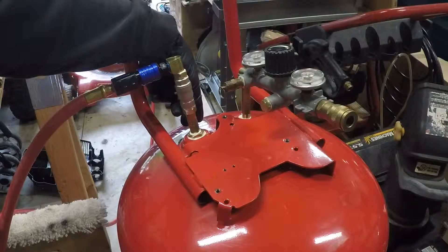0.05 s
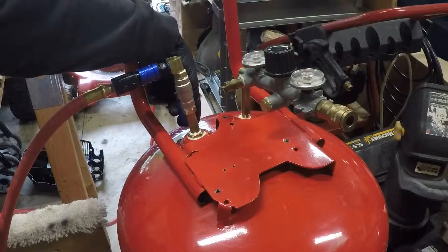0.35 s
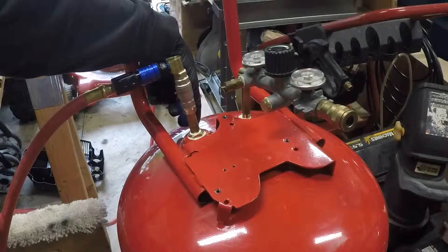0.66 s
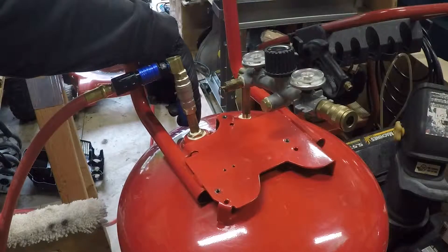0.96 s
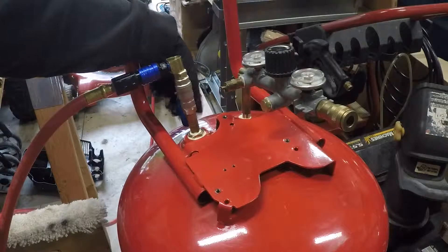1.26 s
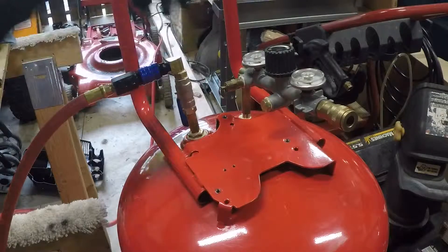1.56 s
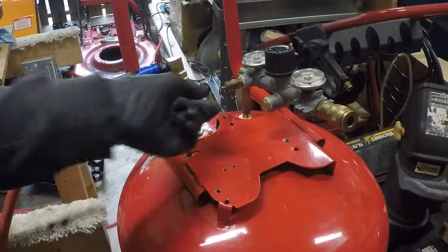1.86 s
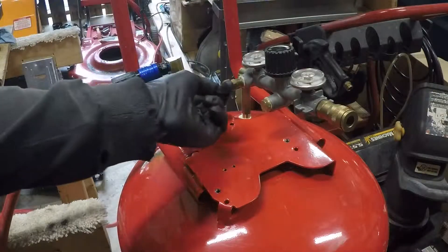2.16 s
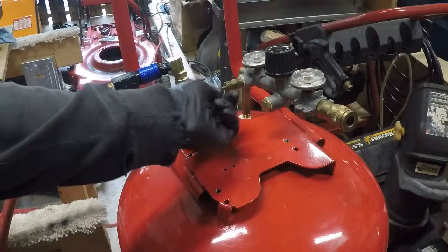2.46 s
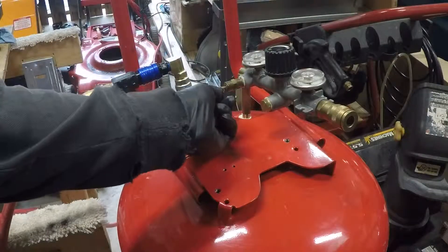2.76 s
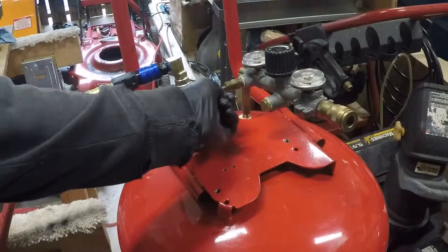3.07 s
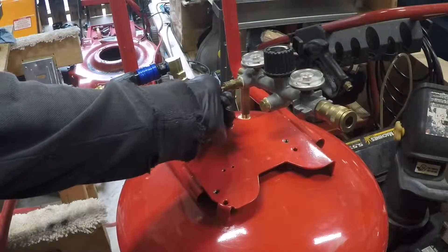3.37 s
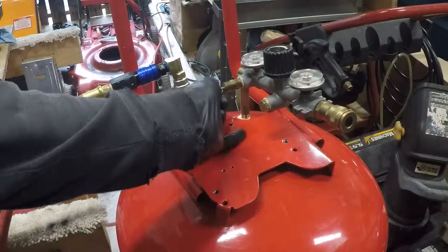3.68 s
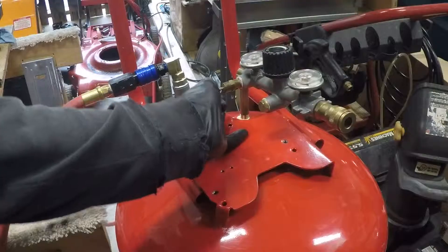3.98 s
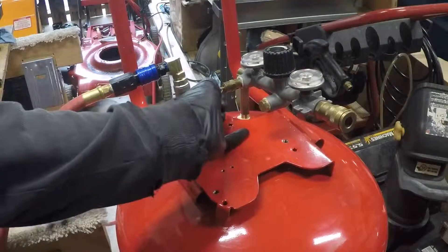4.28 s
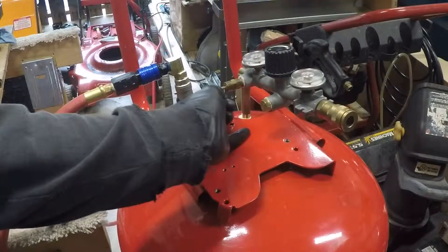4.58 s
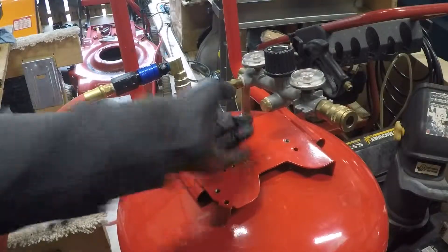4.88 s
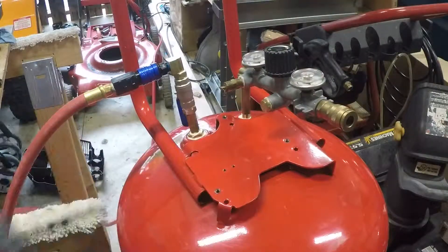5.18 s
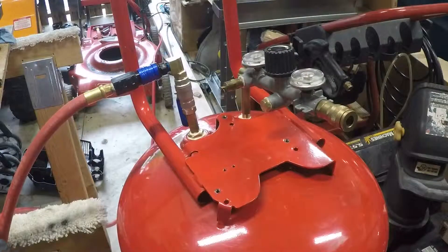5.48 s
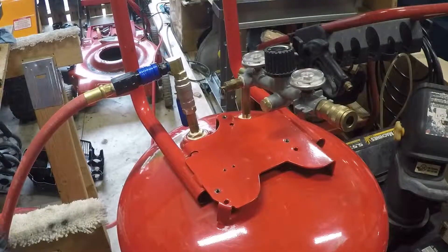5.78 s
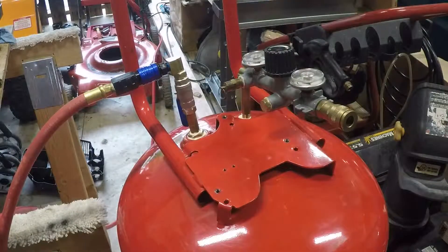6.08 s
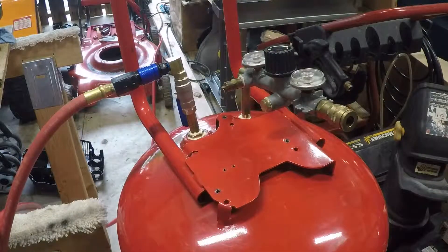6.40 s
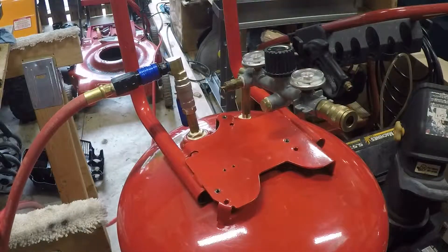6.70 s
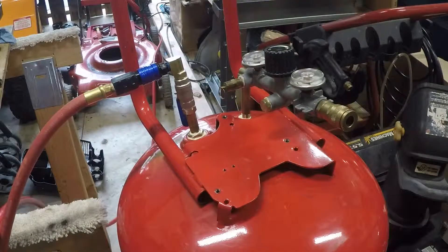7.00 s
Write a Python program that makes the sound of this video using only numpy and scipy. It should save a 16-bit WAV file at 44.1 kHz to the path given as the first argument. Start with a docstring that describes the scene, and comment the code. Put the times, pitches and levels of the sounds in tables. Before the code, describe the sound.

Compressed air hisses steadily into a hollow, ringing steel tank, with two short, loud spits of air, each cut off by a small click.

```python
"""A jet of compressed air pours through a coupling into an empty steel tank in a workshop.
The jet makes the hollow tank ring, and its hiss loses edge as the pressure builds. A gloved hand
works a valve on the tank: air spits out twice, each time cut off by a small click, and a nearby
camera's gain control turns the loud spits down. The workshop rumbles softly underneath."""
import sys
import numpy as np
from scipy import signal
from scipy.fft import rfft, irfft, next_fast_len
from scipy.io import wavfile
from scipy.ndimage import map_coordinates

SR = 44100
rng = np.random.default_rng(int(sys.argv[2]) if len(sys.argv) > 2 else 0)


def to_wav(s):
    """Save 16-bit WAV."""
    ch = np.atleast_2d(s).T  # columns
    pcm = np.round(np.clip(ch, -1, 1) * 32767)  # PCM
    wavfile.write(sys.argv[1], SR, pcm.astype(np.int16))


N = 319706
t = np.arange(N) / SR
FFT_SIZE = next_fast_len(N + SR // 2)
HZ = np.fft.rfftfreq(FFT_SIZE, 1 / SR)

# The workshop's rumble: (frequency [Hz], level [dB])
ROOM_SPECTRUM = [(15, -60), (35, -63.5), (65, -62), (90, -67.5), (120, -79), (200, -83.5), (500, -101)]
# The valve snaps shut: (time [s], knock level [dB], tick level [dB])
VALVE_CLICKS = [(4.089, -19, -22), (4.512, -17, -22)]
# The valve lets air out: (opening time [s], shutting time [s], leak level [dB], gush level [dB])
VALVE_SPITS = [(3.902, 4.082, -0.5, -4), (4.313, 4.516, -1.5, 0)]
# The thin leak past the valve's seal and its full gush: (frequency [Hz], level [dB])
LEAK_SPECTRUM = [(1500, -70.5), (3000, -85), (4400, -46.5), (5500, -48.5), (7000, -54.5), (8800, -59),
                 (11000, -57), (15000, -55.5)]
GUSH_SPECTRUM = [(40, -58), (150, -56), (450, -61.5), (950, -54.5), (1600, -57), (3000, -66), (5500, -54.5),
                 (7500, -52), (9000, -53.5), (11000, -51), (13000, -52), (15000, -45.5)]
# How the tank's tones and the low whistle grow and fade:
# (peak time [s], peak level [dB], rise [dB/s], fall [dB/s])
BEATING_PAIR_PEAKS = [(.25, -24.5, 4.7, 3), (1.8, -22, 13, 3.2), (5.95, -25, 4.1, 7)]
UPPER_RING_PEAKS = [(.4, -20.5, 4, 8.5), (1.85, -22.5, 4, 7.1), (4.6, -26, 1.7, 2)]
LOW_TONE_PEAKS = [(.4, -55.5, 4, 4), (3.3, -47.5, 4.8, 5.7)]
LOW_WHISTLE_PEAKS = [(5.4, -21, 4, 1.7)]
# Modes, the pitches the tank rings at: (frequency [Hz], width [Hz], level above the hiss [dB])
TANK_MODES = [(753, 14, 7), (909, 6, 22), (1079, 6, 19), (1187, 7, 21), (1286, 6, 15), (1313, 6, 11),
              (1488, 8, 19), (1536, 10, 10), (1706, 8, 14), (1838, 9, 12), (1913, 7, 19), (1951, 9, 10),
              (2010, 7, 16), (2077, 11, 14), (2209, 11, 12), (2500, 10, 7), (2548, 7, 11), (2651, 14, 11),
              (3400, 14, 6), (3676, 7, 9), (3878, 10, 7), (3983, 16, 6), (4287, 9, 7), (4457, 9, 7),
              (4686, 8, 9), (5251, 11, 5), (6201, 20, 6)]
# The jet heard through the tank wall: (frequency [Hz], level when empty [dB], level when filled [dB])
JET_SPECTRUM = [(170, -82.5, -79.5), (374, -82.5, -82.5), (926, -78.5, -75), (1733, -71, -71.5),
                (2256, -57, -58), (2790, -53.5, -55.5), (3950, -52, -51.5), (4240, -50, -48),
                (4600, -51.5, -54), (4900, -54, -55), (6740, -56.5, -58.5), (9020, -66.5, -68.5),
                (9750, -65.5, -63), (12950, -69.5, -68.5), (15000, -68.5, -74)]


def amp(db):
    """Turn decibels into a gain, a number to multiply a sound by."""
    return 10 ** (np.asarray(db) / 20)


def unit(x):
    """Scale a signal so that its average power is 1."""
    return x / np.sqrt(np.mean(np.abs(x) ** 2))


def colours(spectrum):
    """Turn each level column of a spectrum table into a gain for every frequency."""
    hz, *columns = np.transpose(spectrum)
    return [amp(np.interp(np.log(HZ + 1), np.log(hz), db)) * np.sqrt(SR / 2) for db in columns]


def filtered(x, gain):
    """Turn each frequency of a sound up or down by its gain."""
    return irfft(rfft(x, FFT_SIZE) * gain, FFT_SIZE)[:N]


def noise(gain):
    """White noise shaped by a gain for every frequency."""
    return filtered(rng.standard_normal(FFT_SIZE), gain)


def wobble(rate):
    """A smooth curve through `rate` random points a second."""
    return map_coordinates(rng.standard_normal(int(N * rate / SR) + 4), [t * rate])


def resonance(hz, width):
    """A peak in the spectrum, 1 at its centre and half that at the edges of its width."""
    return 1 / (1 + (2 * (HZ - hz) / width) ** 2)


def swells(peaks):
    """A gain that climbs to each peak and sinks again; the strongest swell wins."""
    curves_db = [db - np.maximum(rise * (time - t), fall * (t - time)) for time, db, rise, fall in peaks]
    return amp(np.max(curves_db, axis=0))


def tone(hz, width):
    """A wavering tone made from a narrow band of noise, its loudness partly evened out."""
    ring = signal.hilbert(noise(resonance(hz, width) * resonance(hz, 4 * width)))
    loudness = np.abs(unit(ring))
    return unit(ring.real / np.sqrt(loudness + 0.2))


def room_rumble():
    """The workshop's steady, low background noise."""
    return noise(*colours(ROOM_SPECTRUM))


def reflections(x, echo_db=-11, ring_s=0.09, treble_hz=5000):
    """Sound bounces off the tank wall and the clutter around it, rippling the treble."""
    echoes = unit(rfft(rng.standard_normal(N) * amp(-60 * t / ring_s), FFT_SIZE))
    treble = HZ ** 2 / (HZ ** 2 + treble_hz ** 2)
    return filtered(x, 1 + amp(echo_db) * treble * echoes)


def valve_clicks(knock_hz=250, knock_s=0.019, tick_s=0.0067):
    """The shutting valve gives a dull knock with a short tick."""
    sound = np.zeros(N)
    for time, knock_db, tick_db in VALVE_CLICKS:
        age = np.maximum(t - time, 0)
        knock = amp(knock_db - 60 * age / knock_s) * np.sin(2 * np.pi * knock_hz * age)
        tick = amp(tick_db - 60 * age / tick_s) * rng.standard_normal(N)
        sound += (t > time) * (tick - knock)
    return sound


def valve_spits(open_s=0.047, close_s=0.03, tail_s=0.2, sputter_db=0.5):
    """Air leaks as soon as the valve cracks open, then gushes as the gap widens."""
    leak, gush = np.zeros(N), np.zeros(N)
    for opens, shuts, leak_db, gush_db in VALVE_SPITS:
        cracked = np.clip((t - opens) / 0.003, 0, 1)
        gap = np.clip(np.minimum((t - opens) / open_s, (shuts - t) / close_s), 0, 1)
        tail = np.where(t < shuts, 1, amp(-2.5 - 60 * np.abs(t - shuts) / tail_s))  # the room rings on
        leak += amp(leak_db) * cracked * tail
        gush += amp(gush_db) * gap
    air = leak * noise(*colours(LEAK_SPECTRUM)) + gush * noise(*colours(GUSH_SPECTRUM))
    return air * amp(sputter_db * wobble(90))


def tank_singing(waver_db=0.9, hum_db=-55):
    """The flow keeps a few modes sounding: two close ones that beat, a higher ring and two low tones."""
    pair = swells(BEATING_PAIR_PEAKS) * unit(tone(hz=2344, width=12) + tone(hz=2371, width=18))
    upper = swells(UPPER_RING_PEAKS) * tone(hz=2765, width=16)
    low = swells(LOW_TONE_PEAKS) * tone(hz=537, width=10)
    hum = amp(hum_db) * tone(hz=236, width=6)
    return pair + upper * amp(waver_db * wobble(5.98)) + low + hum


def tank_response(ring_s=0.16, crowd_share=0.68, blur_hz=11000):
    """The tank's strong modes stand over a crowd of weak ones, which blur together in the treble."""
    crowd = np.abs(unit(rfft(rng.standard_normal(N) * amp(-60 * t / ring_s), FFT_SIZE))) ** 2
    share = crowd_share / (1 + (HZ / blur_hz) ** 4)
    modes = sum(amp(db) ** 2 * resonance(hz, width) for hz, width, db in TANK_MODES)
    return np.sqrt(1 - share + share * crowd + modes)


def air_jet(pressure_start_s=1.33, pressure_rise_s=3.25, surge_db=0.54, flutter_db=0.23):
    """Swirling air at the inlet whistles and rings the tank; rising pressure changes the hiss."""
    pressure = np.clip((t - pressure_start_s) / pressure_rise_s, 0, 1)
    tank = tank_response()
    empty, filled = [noise(tank * colour) for colour in colours(JET_SPECTRUM)]
    hiss = np.sqrt(1 - pressure) * empty + np.sqrt(pressure) * filled
    high_fade = amp(-21 - 0.2 * t ** 2)  # the coupling's high whistle dies away ever faster
    high_whistle = high_fade * unit(noise(tank * resonance(hz=5310, width=330)))
    low_whistle = swells(LOW_WHISTLE_PEAKS) * unit(noise(tank * resonance(hz=3960, width=300)))
    flow_db = 1.46 - 0.2439 * t  # the flow slowly weakens
    unrest_db = surge_db * wobble(7) + flutter_db * wobble(45)
    return amp(flow_db + unrest_db) * (hiss + high_whistle + low_whistle)


def scene():
    """Add up all the sounds, the same on the left and the right."""
    mono = reflections(air_jet() + valve_spits() + valve_clicks()) + tank_singing() + room_rumble()
    return np.array([mono, mono])


def record(dry, threshold_db=-10.0, squeeze=0.53, window_s=0.058, top_hz=15300):
    """Gain control turns the loud spits down, then recovers; the highest treble is cut off."""
    memory = np.exp(-1 / (window_s * SR))
    recent_power = signal.lfilter([1 - memory], [1, -memory], dry[0] ** 2)
    excess_db = np.maximum(10 * np.log10(recent_power + 1e-12) - threshold_db, 0)
    turned_down = dry * amp(-squeeze * excess_db)
    return np.array([filtered(side, HZ < top_hz) for side in turned_down])


dry = scene()
out = record(dry)
to_wav(out)
```